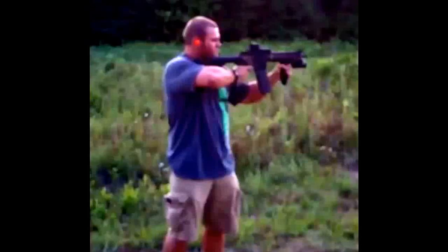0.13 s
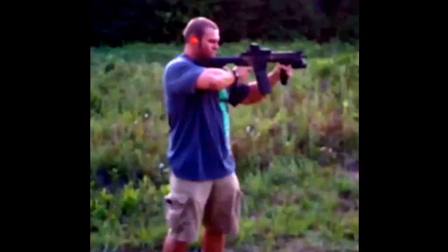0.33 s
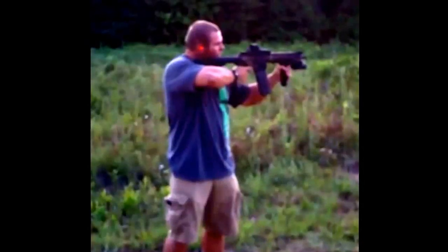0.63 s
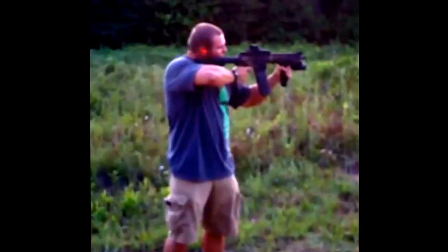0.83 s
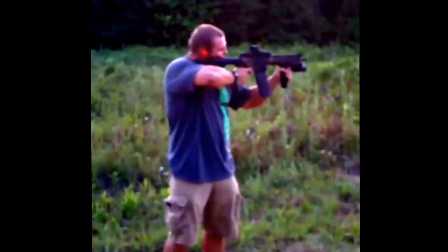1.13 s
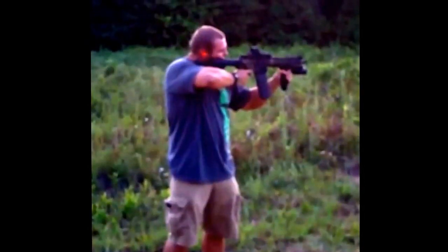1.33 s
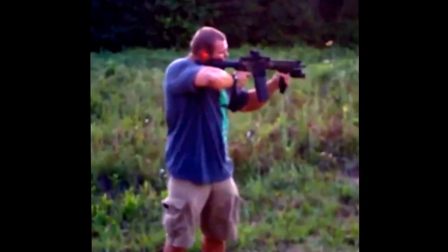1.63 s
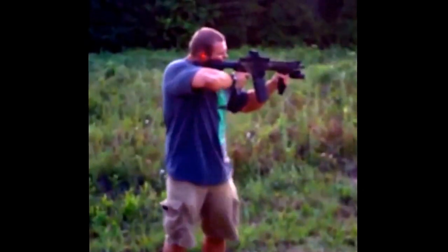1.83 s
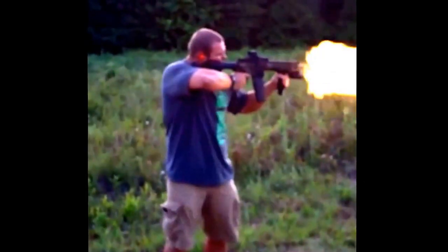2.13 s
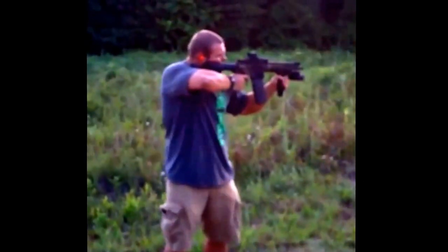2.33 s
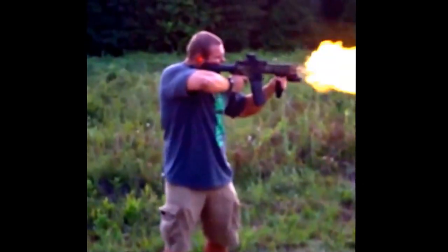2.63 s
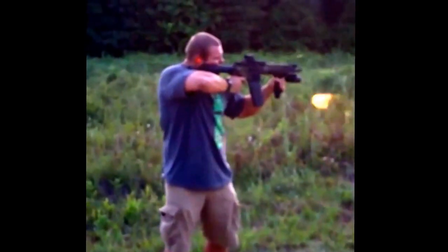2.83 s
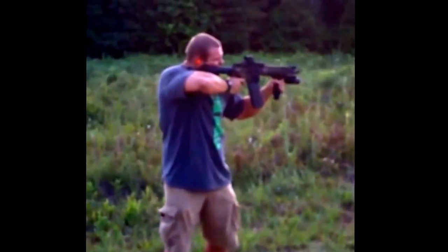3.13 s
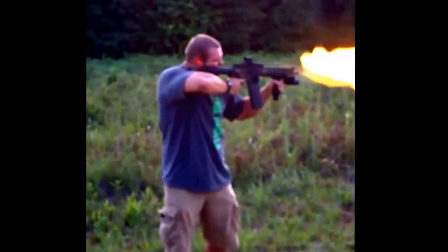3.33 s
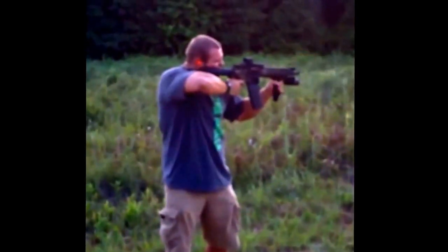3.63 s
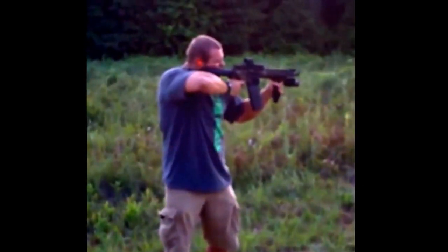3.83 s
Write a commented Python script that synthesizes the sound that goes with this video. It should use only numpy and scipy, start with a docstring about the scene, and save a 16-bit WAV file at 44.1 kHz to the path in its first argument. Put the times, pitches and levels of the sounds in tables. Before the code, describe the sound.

An automatic rifle fires a long, rapid, unbroken burst in a grassy clearing, after a quiet opening with far bird whistles, low air rumble and faint camera hum. The small camera microphone overloads on the shots.

```python
"""A grassy clearing with bushes and trees: far birds and faint ticks, then a long automatic rifle burst.
Birds are whistles gliding through pitch tables; air and far rumble are slowly wavering shaped noise.
Each shot is a sharp front, a noise roar of muzzle gas and a thump, with nearly the same echoes each time.
A small camera adds wavering sine hum and whine; its microphone gain drops on loud sound and overloads."""
import sys
import numpy as np
from scipy import signal
from scipy.fft import rfft, irfft
from scipy.io import wavfile
from scipy.ndimage import uniform_filter1d

SR = 44100
rng = np.random.default_rng(int(sys.argv[2]) if len(sys.argv) > 2 else 0)


def unload_audio(sound):
    """Save the sound as a 16-bit wav file, at the path given as the first command line argument."""
    columns = np.transpose(np.atleast_2d(sound))
    # keep every value between -1 and 1, then stretch to whole-number steps
    steps = np.round(np.clip(columns, -1, 1) * 32767)
    wavfile.write(sys.argv[1], SR, steps.astype(np.int16))


def gain_from_decibels(decibels):
    """Convert decibel values to linear amplitude factors."""
    exponent = np.asarray(decibels, float) / 20
    return 10 ** exponent


N = 176400  # samples, 4 s


def rms_one(x):
    """Scale to rms 1."""
    return x / np.sqrt(np.mean(x ** 2))


def coloured(points, size):
    """Noise of rms 1 whose spectrum follows points of (f/Hz, relative level/dB per Hz)."""
    hz, db = np.transpose(points)
    grid_hz = np.maximum(np.arange(size // 2 + 1) * SR / size, 1)
    shape_db = np.interp(np.log(grid_hz), np.log(hz), db)
    return rms_one(irfft(rfft(rng.standard_normal(size)) * gain_from_decibels(shape_db), size))


def slow(hz):
    """Random wavering of rms 1, low-passed at hz."""
    lowpass = signal.butter(2, hz, fs=SR, output="sos")
    noise = rng.standard_normal(N + SR)
    return rms_one(signal.sosfilt(lowpass, noise)[SR:])  # the filter settles for 1 s


def dying(t, t60):
    """Exponential fall that starts at t = 0 and loses 60 dB in t60 seconds."""
    return (t >= 0) * gain_from_decibels(-60 * np.maximum(t, 0) / t60)


def burst(spectrum, t, hold_s, t60):
    """Noise that rises within half a millisecond, holds, then falls exponentially."""
    attack = np.clip((t - .0002) / 0.00026, 0, 1)
    fall = gain_from_decibels(-60 * np.maximum(t - hold_s, 0) / t60)
    return coloured(spectrum, size=len(t)) * attack * fall


def trough(t, delay, db, hz, cycles):
    """A short wave under a bell envelope whose middle is a dip in pressure."""
    turns = (t - delay) * hz
    return -gain_from_decibels(db) * np.cos(2 * np.pi * turns) * np.exp(-(turns / cycles) ** 2)


def swing(t, db, hz, t60):
    """A low pressure swing: a sine that dies exponentially."""
    return gain_from_decibels(db) * np.sin(2 * np.pi * hz * t) * dying(t, t60)


def add(out, s, sound):
    """Mix a sound in at s seconds."""
    i = int(s * SR)
    out[i:i + len(sound)] += sound[:N - i]


# air and far rumble at the microphone: (f/Hz, relative level/dB per Hz)
FIELD_SPECTRUM = [(18, -33), (30, -15), (72, -12.5), (138, -11), (350, -9), (900, -16), (1830, -21),
                  (3600, -30.5), (4400, -33), (4750, -57), (5300, -43), (5900, -68), (7000, -49),
                  (7900, -51), (8400, -77), (12000, -90), (22000, -120)]


def field():
    """Air and far rumble: shaped noise whose level wavers slowly."""
    level_db = -50 + 1.26 * slow(2.8)
    return gain_from_decibels(level_db) * coloured(FIELD_SPECTRUM, size=N)


# pitches of the camera's hum and whine: (f/Hz)
HUM_PITCHES = [59.9, 300, 2159, 4226, 6352]
# one row per pitch: (level/dB rms before wavering and dips, wavering [share; also rad of phase], dip depth [0-1])
HUM_LINES = [(-43.5, 0.03, 0.26), (-53, 0.2, 0.35), (-67, 0.69, 0.57), (-66, 0.24, .9), (-90, 0.39, 0.59)]
DROPOUTS_PER_S, DROPOUT_AT_S, DROPOUT_S = 29.97, 0.0017, 0.0024  # one per frame; first centre; 1/e half width


def camera():
    """Steady sine lines that waver in level and phase and dip once a frame, each to its own depth."""
    t = np.arange(N) / SR
    frame_phase = ((t - DROPOUT_AT_S) * DROPOUTS_PER_S + .5) % 1 - .5
    gap = np.exp(-(frame_phase / (DROPOUTS_PER_S * DROPOUT_S)) ** 2)
    out = np.zeros(N)
    for hz, (db, share, depth) in zip(HUM_PITCHES, HUM_LINES):
        level = gain_from_decibels(db) * np.sqrt(2) * (1 + share * slow(12)) * (1 - depth * gap)
        out += level * np.sin(2 * np.pi * hz * t + share * slow(18))
    return out


# far bird whistles: (t/s into the call, f/Hz, level/dB rms before call level and flutter)
ARCH_WHISTLE = [(0, 4800, -90), (.008, 5080, -71), (.03, 5330, -77), (.046, 6380, -79), (.06, 6460, -74),
                (.08, 5170, -81), (.1, 4300, -64), (.13, 3870, -59.5), (.155, 3700, -62), (.165, 3700, -85)]
DIP_WHISTLE = [(0, 7200, -80), (.012, 7000, -69), (.024, 5000, -76), (.033, 3600, -53.5), (.045, 4900, -68),
               (.065, 6900, -75.5), (.09, 7430, -74), (.105, 7900, -86)]
RISE_WHISTLE = [(0, 6800, -85), (.015, 7500, -83), (.03, 8000, -80), (.035, 8000, -90)]
# calls of each whistle: (t/s, added level/dB)
ARCH_TIMES = [(.058, -2), (0.339, 0.32), (.655, 0.32)]
DIP_TIMES = [(1.0, 0), (1.243, 0)]
RISE_TIMES = [(.292, 0), (.608, 0)]
FLUTTER_DB, FLUTTER_HZ = 3.5, 50  # whistles waver on their way: rms depth, low-pass of the wavering


def birds():
    """Pure whistles: sines whose pitch and level glide through each call's shape."""
    out = np.zeros(N)
    voices = (ARCH_WHISTLE, ARCH_TIMES), (DIP_WHISTLE, DIP_TIMES), (RISE_WHISTLE, RISE_TIMES)
    for shape, calls in voices:
        s, hz, db = np.transpose(shape)
        t = np.arange(int(s[-1] * SR)) / SR
        pitch_hz = uniform_filter1d(np.interp(t, s, hz), size=200)
        whistle = np.sqrt(2) * np.sin(2 * np.pi * np.cumsum(pitch_hz) / SR)
        for start, call_db in calls:
            add(out, start, gain_from_decibels(call_db + np.interp(t, s, db)) * whistle)
    return out * gain_from_decibels(FLUTTER_DB * slow(FLUTTER_HZ))


# faint ticks in the grass: (t/s, level/dB, f/Hz, spread [pitch ratio])
GRASS_TICKS = [(.723, -63, 7500, 1.02), (.927, -56, 3000, 1.2), (1.174, -55, 3280, 1.1),
               (1.212, -62, 3000, 1.05)]
TICK_S = .004  # 1/e half length


def ticks():
    """Small ticks in the grass: narrow noise under a bell envelope."""
    out, t = np.zeros(N), np.arange(SR // 10) / SR
    bell = np.exp(-(t / TICK_S - 2) ** 2)
    for s, db, hz, width in GRASS_TICKS:
        band = [(hz / width ** 4, -70), (hz / width, -4), (hz, 0), (hz * width, -4), (hz * width ** 4, -70)]
        add(out, s, gain_from_decibels(db) * bell * coloured(band, size=len(t)))
    return out


# rattling lock parts: (f/Hz, relative level/dB per Hz)
RATTLE_SPECTRUM = [(300, -28), (1000, -13), (2600, 13), (4000, -12), (5500, -19), (7300, -16), (9000, -35),
                   (16000, -70)]
HAMMER_S, HAMMER_DB, HAMMER_HZ, HAMMER_T60_S = 1.3316, -11, 2450, 0.0091
RATTLE_DB, RATTLE_T60_S = -25, 0.045
FIRST_CRACKLE_S, FIRST_CRACKLE_DB = 1.3409, -13


def hammer():
    """The hammer rings as a dying sine, lock parts rattle, and a thin rattle runs just ahead of the blast."""
    out, t = np.zeros(N), np.arange(SR // 10) / SR
    ring = swing(t, HAMMER_DB, HAMMER_HZ, HAMMER_T60_S) * np.minimum(t / 0.00033, 1)
    rattle = gain_from_decibels(RATTLE_DB) * burst(RATTLE_SPECTRUM, t, 0.00076, RATTLE_T60_S)
    add(out, HAMMER_S, ring + rattle)
    add(out, FIRST_CRACKLE_S, gain_from_decibels(FIRST_CRACKLE_DB) * burst(ROAR_SPECTRUM, t, .001, .003))
    return out


# shots of the burst: (t/s, added level/dB)
SHOT_TIMES = [(1.3423, 0.5), (1.4437, 1), (1.5138, -0.5), (1.5859, 1), (1.6567, 0.5), (1.7606, 1.5),
              (1.831, 1), (1.9053, 0), (1.9776, 0), (2.0484, 0.5), (2.1204, -1), (2.1915, -1), (2.2614, -1),
              (2.332, 0), (2.4026, 1), (2.4765, 0.5), (2.546, 0), (2.6169, 0), (2.6863, -1), (2.758, 0.5),
              (2.8273, -0.5), (2.8956, -0.5), (2.9656, 0), (3.0354, -0.5), (3.1049, -0.5), (3.1737, -1.5),
              (3.2409, -0.5), (3.3164, 0), (3.3843, -1), (3.4531, 0.5), (3.52, -0.5), (3.5886, -0.5),
              (3.6587, 0), (3.7288, 0.5), (3.7969, -0.5), (3.8651, 0), (3.934, 0)]
# the front and its echoes at the microphone, delay after the shot: (t/s)
ARRIVAL_DELAYS = [.00015, .0029, .0047, .0058, .0081, .0084, .0137, .0179, .0192, .0223, .0306, .0308,
                  .0375, .0378, .0425, .0423, .0477, .0496, .0563, .0582, .062, .063]
# one row per delay: (peak level/dB, f/Hz, width [cycles, before the least echo width])
ARRIVAL_WAVES = [(26, 1070, 0.16), (6, 2600, .8), (10, 1660, 0.29), (10, 880, 1.02), (10.5, 303, 0.52),
                 (9, 1120, 1.56), (-7, 230, 1.2), (2.5, 810, 0.29), (10, 830, 0.85), (6, 1300, 0.27),
                 (-30, 1600, 1.2), (-11, 265, 2.4), (-4.5, 650, 0.31), (-7.5, 250, 0.91), (-7.5, 230, .6),
                 (-8, 800, .9), (5, 960, 0.83), (4.5, 1080, 0.81), (1.5, 980, 0.62), (2.5, 1260, 0.63),
                 (1.5, 1220, 0.85), (-2, 1120, 0.73)]
ARRIVAL_JITTER_S, ARRIVAL_SPREAD_DB = .00004, 1  # chance from shot to shot, rms
ECHO_LEAST_CYCLES = .55  # echoes are never as sharp as the front
# roar of muzzle gas: (f/Hz, relative level/dB per Hz)
ROAR_SPECTRUM = [(35, -44), (60, -5.5), (660, -0.5), (1340, -2.5), (1800, -0.5), (2300, -4), (3100, -4.5),
                 (4200, -15), (4900, -37), (7200, -31), (8400, -37), (10000, -95), (16000, -120)]
ROAR_DB, ROAR_HOLD_S, ROAR_T60_S = 10.5, 0.0044, 0.026
# bright edge of the roar: (f/Hz, relative level/dB per Hz)
CRACK_SPECTRUM = [(2500, -46), (4000, 7), (7200, -3.5), (10000, -14), (14000, -24), (16000, -45),
                  (20000, -80)]
CRACK_DB, CRACK_HOLD_S, CRACK_T60_S = -7, 0.0032, 0.0075
THUMP_DB, THUMP_HZ, THUMP_T60_S = 6, 91, 0.022
# the first blast drives the microphone further: (level/dB, f/Hz, t60/s)
FIRST_BLAST_THUMP = (24, 90, .032)
# and its pressure swings back once: (delay t/s, level/dB, f/Hz, width [cycles])
FIRST_BLAST_SWING = (0.001724, 25.2, 458, 0.52)
# scatter from grass, bushes and trees: (f/Hz, relative level/dB per Hz)
SCATTER_SPECTRUM = [(35, -47), (60, -16), (210, -6.5), (270, -2), (310, -5.5), (365, -2.5), (470, -11.5),
                    (680, -3), (780, -9), (890, 2), (970, -15.5), (1070, -0.5), (1310, -12.5), (1730, -10),
                    (2180, -9), (3000, -13), (4400, -25), (4850, -45), (5900, -52), (7000, -43),
                    (8200, -52), (9000, -90), (15900, -125)]
NEAR_DB, NEAR_T60_S, FAR_DB, FAR_T60_S = -5, .4, -16, 1.5  # the same for each shot
STIRRED_DB, STIRRED_T60_S = -10, .3  # new with each shot
# short, uneven treble of the scatter: (f/Hz, relative level/dB per Hz)
SHEEN_SPECTRUM = [(4300, -33), (5200, 1), (5900, -15), (7100, -1), (8200, -10), (9500, -24), (10500, -60),
                  (12000, -110)]
SHEEN_DB, SHEEN_T60_S, SHEEN_SPREAD_DB = -34, .14, 5  # mean level, fall, rms spread between shots


def rifle():
    """Every shot sums pressure troughs (front, echoes), noise roar, a low thump and decaying noise scatter."""
    out, t = np.zeros(N), np.arange(SR) / SR
    lead_s = 44 / SR  # room ahead of the front for its wave to rise
    short = t[:4096] - lead_s
    delay = np.array(ARRIVAL_DELAYS)[:, None]
    peak_db, hz, cycles = np.transpose(ARRIVAL_WAVES)[:, :, None]
    cycles = np.maximum(cycles, ECHO_LEAST_CYCLES * (delay > .001))
    swell = np.minimum(t / 0.0031, 1)
    near_far = gain_from_decibels(NEAR_DB) * dying(t, NEAR_T60_S) + gain_from_decibels(FAR_DB) * dying(t, FAR_T60_S)
    same_scatter = coloured(SCATTER_SPECTRUM, size=SR) * swell * near_far
    stirred_fall = (swell * dying(t, STIRRED_T60_S))[:SR // 2]
    for k, (s, db) in enumerate(SHOT_TIMES):
        time_chance, level_chance = rng.standard_normal((2, len(delay), 1))
        waves = trough(short, delay + ARRIVAL_JITTER_S * time_chance,
                       peak_db + ARRIVAL_SPREAD_DB * level_chance, hz, cycles)
        roar = gain_from_decibels(ROAR_DB) * burst(ROAR_SPECTRUM, short, ROAR_HOLD_S, ROAR_T60_S)
        crack = gain_from_decibels(CRACK_DB) * burst(CRACK_SPECTRUM, short, CRACK_HOLD_S, CRACK_T60_S)
        if k == 0:
            thump = swing(short, *FIRST_BLAST_THUMP) + trough(short, *FIRST_BLAST_SWING)
        else:
            thump = swing(short, THUMP_DB, THUMP_HZ, THUMP_T60_S)
        stirred = gain_from_decibels(STIRRED_DB) * coloured(SCATTER_SPECTRUM, size=SR // 2) * stirred_fall
        sheen_db = SHEEN_DB + SHEEN_SPREAD_DB * rng.standard_normal()
        sheen = gain_from_decibels(sheen_db) * burst(SHEEN_SPECTRUM, short, 0.0056, SHEEN_T60_S)
        add(out, s - lead_s, gain_from_decibels(db) * (waves.sum(0) + roar + crack + thump))
        for scatter in (sheen, same_scatter, stirred):
            add(out, s, gain_from_decibels(db) * scatter)
    return out


def scene():
    """Everything in the clearing, faded in over 4.9 ms as the microphone opens at 0.0428 s."""
    opening = np.clip((np.arange(N) / SR - 0.0428) / 0.0049, 0, 1)
    clearing = field() + camera() + birds() + ticks() + hammer() + rifle()
    return (clearing * opening)[None]


def low_pass(x):
    """Removes everything above the highest recorded frequency."""
    return signal.sosfilt(signal.butter(12, 16040, fs=SR, output="sos"), x)


GAIN_FROM_DB, GAIN_MOST_DB = -8, 17.5  # peak level where the gain starts to drop, largest drop
GAIN_ATTACK_S, GAIN_RELEASE_DB_PER_S = 0.001, 49
DRIVE_DB, HARDNESS = 0.5, 13  # level into the overload, sharpness of its knee (exponent)
SMOOTH_HZ = 14400  # the converter rounds off the top


def record(dry):
    """Microphone gain that drops fast and returns slowly, then overload and a rounded-off top."""
    ramp = GAIN_RELEASE_DB_PER_S * np.arange(N) / SR
    over_db = np.clip(20 * np.log10(np.abs(dry) + 1e-9) - GAIN_FROM_DB, 0, GAIN_MOST_DB)
    cut_db = np.maximum.accumulate(over_db + ramp, axis=1) - ramp  # held peaks, released steadily
    r = np.exp(-1 / (GAIN_ATTACK_S * SR))
    smooth_cut_db = signal.lfilter([1 - r], [1, -r], cut_db)
    driven = dry * gain_from_decibels(DRIVE_DB - smooth_cut_db)
    clipped = driven / (1 + np.abs(driven) ** HARDNESS) ** (1 / HARDNESS)
    lowpass = signal.butter(2, SMOOTH_HZ, fs=SR, output="sos")
    return low_pass(signal.sosfilt(lowpass, clipped))


dry = scene()
out = record(dry)
unload_audio(out)
```